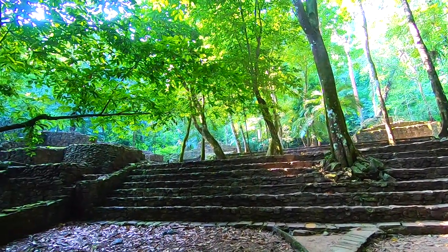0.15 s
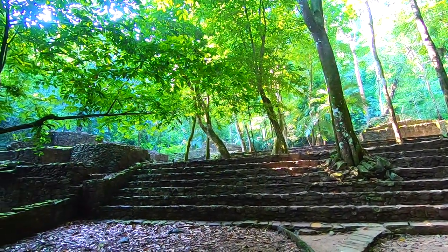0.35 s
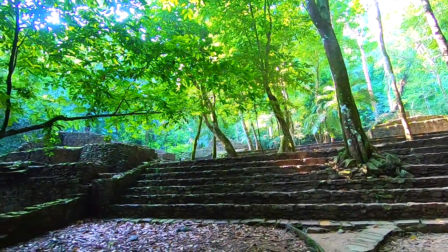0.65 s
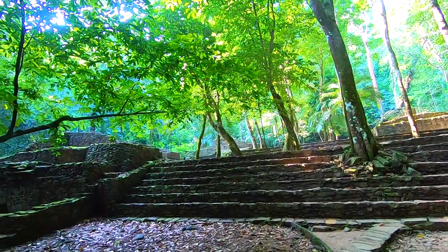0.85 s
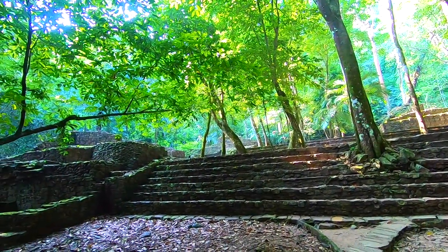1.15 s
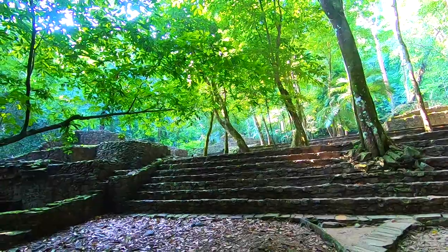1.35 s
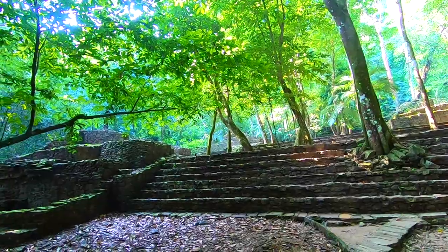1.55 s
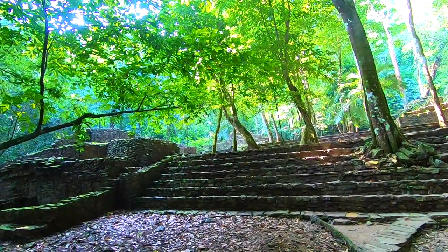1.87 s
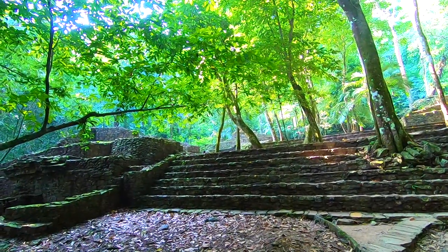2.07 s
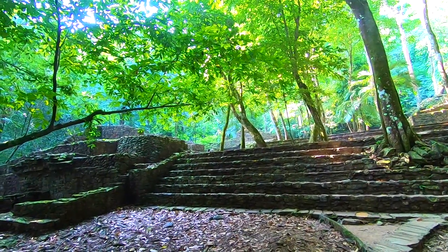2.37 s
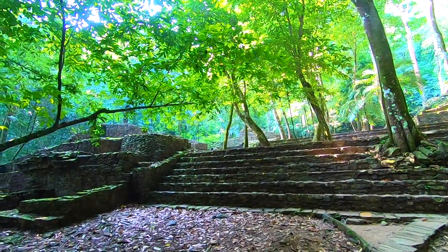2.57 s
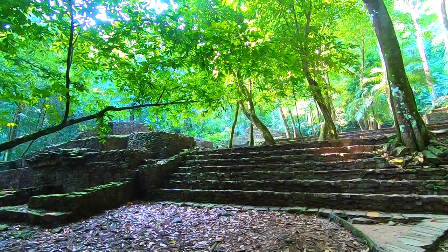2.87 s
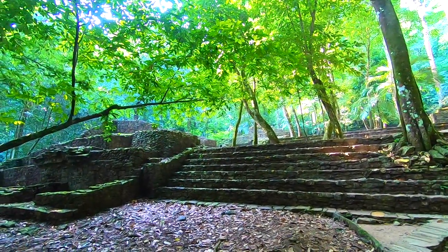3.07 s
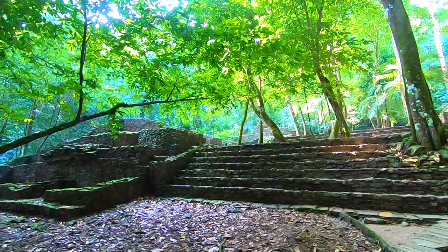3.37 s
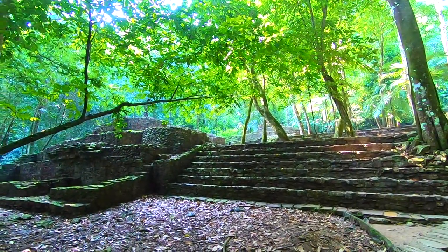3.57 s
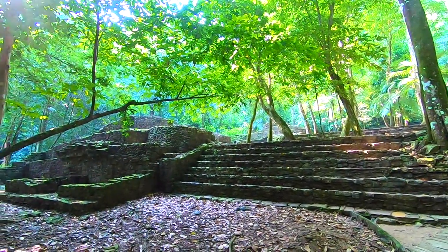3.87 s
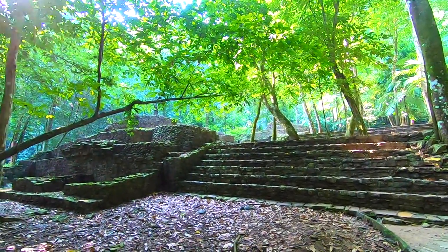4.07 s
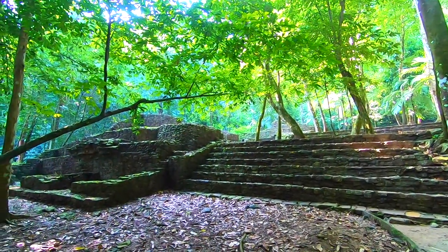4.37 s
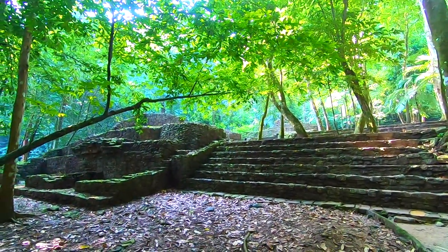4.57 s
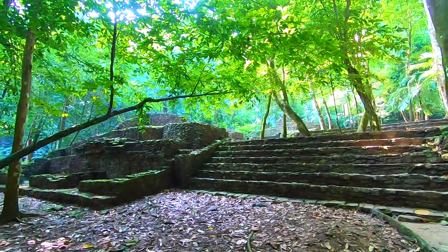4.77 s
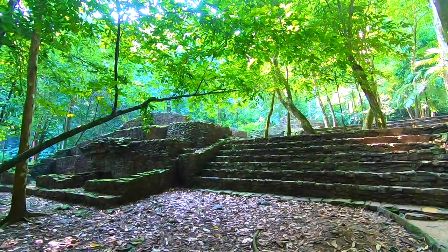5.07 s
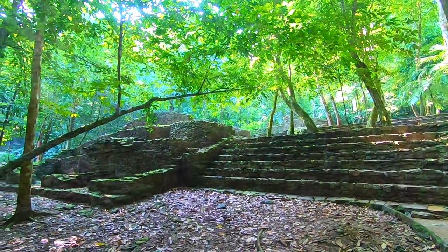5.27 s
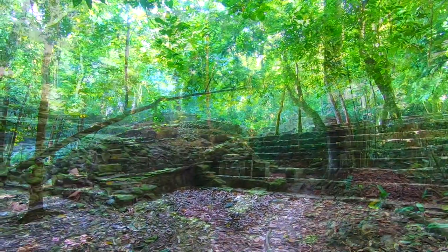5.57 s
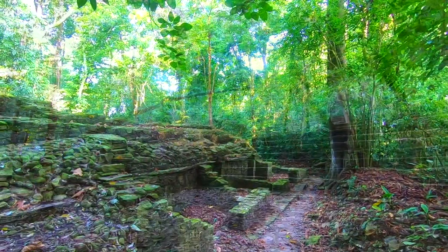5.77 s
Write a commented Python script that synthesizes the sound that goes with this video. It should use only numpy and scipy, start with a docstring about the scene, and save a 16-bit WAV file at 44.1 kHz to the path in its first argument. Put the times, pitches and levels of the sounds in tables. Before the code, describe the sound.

Smooth, wide stereo hiss of far leaves and insects fills a jungle clearing with stone steps. A small bird chirps faintly at the start and near three seconds; a distant bird whistles after four. Near the end the hiss crossfades into duller, sheltered air. The microphone is open and far from the birds.

```python
"""The bright, even hiss of far leaves and insects fills a jungle clearing: shaped stereo noise.
A distant bird whistles and a small one chirps: wavering, falling near sines, smeared by tree echoes.
Low air (noise below the hiss) and surges of a deep wavering sine lie beneath.
Near the end the hiss fades over into the duller, quieter air of another spot."""
import sys
import numpy as np
from scipy import signal
from scipy.io import wavfile
from scipy.ndimage import uniform_filter1d

SR = 44100
rng = np.random.default_rng(int(sys.argv[2]) if len(sys.argv) > 2 else 0)


def wav_record(signal):
    """Record a signal, one row per channel, as 16-bit PCM in the file named by sys.argv[1]."""
    frames = np.transpose(np.atleast_2d(signal))
    bounded = np.clip(frames, -1, 1)
    # unit amplitude maps onto the largest positive 16-bit level
    quanta = np.round(bounded * 32767).astype(np.int16)
    wavfile.write(sys.argv[1], SR, quanta)


N = 261500
SIZE, HOP = 2048, 512  # spectral frame and step (samples)
BIN_HZ = np.fft.rfftfreq(SIZE, 1 / SR)
FRAME_S = np.arange(N // HOP + 5) * HOP / SR


def gain_of(db):
    """Decibels to amplitude."""
    return 10 ** (np.asarray(db) / 20)


def evened(x):
    """Scales to rms 1."""
    return x / np.sqrt(np.mean(x ** 2) + 1e-20)


def read(points):
    """Interpolates a table over frequency to the bins, on a log axis."""
    hz, value = np.transpose(points)
    return np.interp(np.log(BIN_HZ + 1), np.log(hz + 1), value)


def add(mix, start_s, sound):
    """Mixes a sound in at start_s."""
    part = mix[max(round(start_s * SR), 0):][:len(sound)]
    part += sound[:len(part)]


def bump(t, center_s, half_length_s):
    """A Gaussian rise and fall of height 1; half_length_s is its 1/e half width."""
    return np.exp(-((t - center_s) / half_length_s) ** 2)


def band_swell(center_s, half_length_s, center_hz, half_width_octaves, rise_db):
    """A dB field that lifts one band for a moment."""
    band = np.exp(-(np.log2((BIN_HZ + 1) / center_hz) / half_width_octaves) ** 2)
    return rise_db * bump(FRAME_S[:, None], center_s, half_length_s) * band


def patches(size, count):
    """Random field of rms 1, smoothed over size frames and count bins."""
    field = rng.standard_normal((len(FRAME_S), len(BIN_HZ)))
    field = uniform_filter1d(field, size, axis=0)
    return evened(uniform_filter1d(field, count, axis=1))


# Likeness of the two channels: frequency_hz, correlation (-1 to 1)
CHANNEL_LIKENESS = [(50, 0.5), (100, 0), (160, 0.5), (280, 1), (480, 0.85), (650, 0.54), (1100, 0.35),
                    (2000, .5), (4200, 0.85), (5000, 0.42), (6000, 0.37), (8500, 0.01), (11000, -0.22)]
# Level balance of the channels: frequency_hz, left_minus_right_db
CHANNEL_BALANCE = [(60, -1), (99, -1), (160, 0), (270, -1), (440, -1.5), (720, -3.5), (1180, -2),
                   (1940, -2.5), (3190, -2.0), (5250, -1.5), (8630, 1.5), (14200, 2)]
# Phase between the channels: frequency_hz, left_lead_rad
CHANNEL_LEAD = [(100, 1.14), (630, -0.13), (1000, 0.54), (2400, 0.003), (4000, 0.62), (5200, 0.37),
                (8000, -1), (10000, 0.13)]


def air(field_db):
    """Partly correlated stereo noise, coloured by a dB field; its mid has rms 1."""
    a, b, c, d = rng.standard_normal((4, len(FRAME_S), len(BIN_HZ)))
    likeness = np.clip(read(CHANNEL_LIKENESS), -1, 1)
    left, independent = a + 1j * b, c + 1j * d
    right = likeness * left + np.sqrt(1 - likeness ** 2) * independent
    right = right * np.exp(-1j * read(CHANNEL_LEAD))
    balance = gain_of(read(CHANNEL_BALANCE) / 2)
    spectra = np.array([left * balance, right / balance]) * gain_of(field_db)
    _, x = signal.istft(spectra, nperseg=SIZE, noverlap=SIZE - HOP, time_axis=1, freq_axis=2)
    x = x[:, :N]
    return x / np.std(x.mean(0))


LOW_AIR_START_DB, LOW_AIR_RISE_DB_PER_S = -87, 0.5
DRONE_HZ, DRONE_WAVER_SHARE = 51.3, .06  # waver: rms share of the pitch
# Low air spectrum: frequency_hz, relative_level_db_per_hz
LOW_AIR_SPECTRUM = [(15, -13), (32, -1), (55, -9), (72, -6), (120, -13), (200, -20), (500, -70)]
# Surges of the deep drone: center_s, half_length_s, level_db
DRONE_SURGES = [(2.73, .25, -84.5), (4.3, .15, -89), (4.93, .08, -84), (5.148, 0.046, -74),
                (5.32, 0.04, -76), (5.5, .05, -81)]


def rumble(roar_db=-11):
    """Slowly rising low noise, plus surges of a deep wavering sine with some low noise in it."""
    t = np.arange(N) / SR
    low_air = gain_of(LOW_AIR_START_DB + LOW_AIR_RISE_DB_PER_S * t) * air(read(LOW_AIR_SPECTRUM))
    waver = np.interp(t, FRAME_S, patches(size=8, count=1)[:, 0])
    drone_hz = DRONE_HZ * (1 + DRONE_WAVER_SHARE * waver)
    drone = evened(np.sin(2 * np.pi * np.cumsum(drone_hz) / SR))
    roaring_drone = evened(drone + gain_of(roar_db) * air(read(LOW_AIR_SPECTRUM)))
    surges = sum(gain_of(level_db) * bump(t, center_s, half_length_s)
                 for center_s, half_length_s, level_db in DRONE_SURGES)
    return low_air + roaring_drone * surges


DULL_LEVEL_DB = -48.5  # mid rms
LOWER_REST_DB, LOWER_RISE_START_S, LOWER_RISE_S, LOWER_RISE_DB_PER_S = -2.5, 5.805, 0.066, 33
# Dull air spectrum: frequency_hz, relative_level_db_per_hz
DULL_SPECTRUM = [(70, -22), (130, -7), (170, -3), (260, 1), (480, -2.5), (700, 2), (1100, 0.5), (1600, 5),
                 (2300, 2.5), (3100, -1.5), (3800, -7), (4500, -10.5), (7000, -22), (10300, -31),
                 (12000, -49)]
# One brief low hum: center_s, half_length_s, center_hz, half_width_octaves, rise_db
LOW_HUM = (5.875, .045, 230, 0.12, 9.8)


def dull_air(patchy_db=2, treble_hz=2800):
    """Noise of a more sheltered spot: little treble, a rise in the lower bands, one brief low hum."""
    rise_s = np.clip(FRAME_S - LOWER_RISE_START_S, 0, LOWER_RISE_S)
    lower_db = LOWER_REST_DB + LOWER_RISE_DB_PER_S * rise_s
    lower_bands = 1 / (1 + (BIN_HZ / treble_hz) ** 4)
    swell = lower_db[:, None] * lower_bands + band_swell(*LOW_HUM)
    field_db = read(DULL_SPECTRUM) + swell + patchy_db * patches(size=10, count=16)
    return gain_of(DULL_LEVEL_DB) * air(field_db)


def trees(x, t60_s, direct_db, scatter_db):
    """Trunks and stone steps scatter a call into many small decaying echoes, others at each ear."""
    t = np.arange(SR) / SR
    echoes = rng.standard_normal((2, SR)) * (rng.random((2, SR)) < 2000 / SR)  # 2000 per second
    echoes *= gain_of(-60 * t / t60_s)
    echoes /= np.linalg.norm(echoes, axis=1, keepdims=True)
    scattered = signal.fftconvolve(x[None], echoes, axes=1)[:, :N]
    return gain_of(direct_db) * x + gain_of(scatter_db) * scattered


def note(length_s, start_hz, fall_hz, bend, peak, edge_db, warble):
    """A bird note of rms 1: a wavering near sine that slides down while it swells and fades."""
    u = np.linspace(0, 1, int(length_s * SR))
    waver = evened(uniform_filter1d(rng.standard_normal(N), size=120))[:len(u)]
    pitch_hz = (start_hz - fall_hz * u ** bend) * (1 + warble * waver)
    level_db = np.interp(u, (0, np.clip(peak, 0, 1), 1), (edge_db, 0, edge_db))
    envelope = gain_of(level_db) * signal.windows.tukey(len(u), .2)
    return evened(envelope * np.sin(2 * np.pi * np.cumsum(pitch_hz) / SR))


# bend: pitch-fall exponent; peak: share of length; edge: level at the ends; warble: share of pitch
CHIRP_SHAPE = dict(bend=0.83, peak=0.64, edge_db=-8, warble=0.028)
CHIRP_LEFT_MINUS_RIGHT_DB = 5
# Thin chirps, before the trees: start_s, length_s, start_hz, fall_hz, level_db
CHIRP_NOTES = [(0.02, 0.072, 7270, 150, -62), (2.68, .036, 9230, 1400, -60), (2.708, .04, 8570, 1015, -56),
               (2.775, .06, 7620, 756, -60.5)]


def chirper():
    """A small bird deep among the trees: quick, buzzy, falling near sines."""
    out = np.zeros(N)
    for start_s, length_s, start_hz, fall_hz, level_db in CHIRP_NOTES:
        chirp = note(length_s, start_hz, fall_hz, **CHIRP_SHAPE)
        add(out, start_s, gain_of(level_db) * chirp)
    return out


WHISTLE_SHAPE = dict(bend=1.65, peak=0.69, edge_db=-1, warble=0.0098)  # pitch holds, then droops
# Slurred whistles, before the trees: start_s, length_s, start_hz, fall_hz, level_db
WHISTLE_NOTES = [(4.344, 0.18, 2348, 23, -58), (4.475, .075, 2250, 105, -54), (4.653, 0.11, 2325, 20, -60),
                 (4.951, 0.21, 2350, 52, -57.5), (5.11, 0.157, 2240, 49, -56),
                 (5.868, 0.086, 2330, 25, -54.5)]


def whistler():
    """A distant bird: thin near sines that hold their pitch, then droop."""
    out = np.zeros(N)
    for start_s, length_s, start_hz, fall_hz, level_db in WHISTLE_NOTES:
        whistle = note(length_s, start_hz, fall_hz, **WHISTLE_SHAPE)
        add(out, start_s, gain_of(level_db) * whistle)
    return out


HISS_LEVEL_DB = -46  # mid rms
# Bright hiss spectrum: frequency_hz, relative_level_db_per_hz
HISS_SPECTRUM = [(110, -59), (135, -20.5), (155, -10), (300, -8), (520, -7), (740, -3), (1700, 0),
                 (3350, -2), (4800, -8), (6800, -8.5), (8200, -13.5), (9300, -20.5), (10200, -16.5),
                 (11400, -33.5)]
# Soft swells of the low murmur: center_s, half_length_s, center_hz, half_width_octaves, rise_db
MURMUR_SWELLS = [(1.21, 0.097, 400, 0.79, 3.5), (1.364, 0.068, 443, 0.51, 5.5),
                 (3.066, 0.023, 317, 0.68, 9.5)]


def canopy(patchy_db=.5):
    """Countless far leaves and insects merge into smooth noise; its low murmur swells now and then."""
    swells = sum(band_swell(*row) for row in MURMUR_SWELLS)
    field_db = read(HISS_SPECTRUM) + patchy_db * patches(size=12, count=24) + swells
    return gain_of(HISS_LEVEL_DB) * air(field_db)


FADE_START_S, FADE_END_S = 5.295, 5.986


def scene():
    """The bright hiss gives way to the duller air; birds and rumble lie over both."""
    fade = np.interp(np.arange(N) / SR, (FADE_START_S, FADE_END_S), (0, 1))
    forest = (1 - fade) * canopy() + fade * dull_air() + rumble()
    whistles = trees(whistler(), t60_s=1.1, direct_db=-1.5, scatter_db=-.5)
    chirps = trees(chirper(), t60_s=0.69, direct_db=-4, scatter_db=1.5)  # more echo than direct
    chirps *= gain_of(np.array([[1], [-1]]) * CHIRP_LEFT_MINUS_RIGHT_DB / 2)
    return forest + whistles + chirps


EDGE_HZ = 14250


def record(dry):
    """The recorder's band limit: a linear-phase low-pass."""
    low_pass = signal.firwin(511, EDGE_HZ, window=("kaiser", 9), fs=SR)
    return signal.oaconvolve(dry, low_pass[None], "same")


dry = scene()
out = record(dry)
wav_record(out)
```